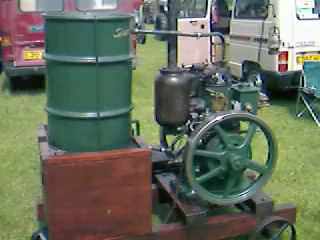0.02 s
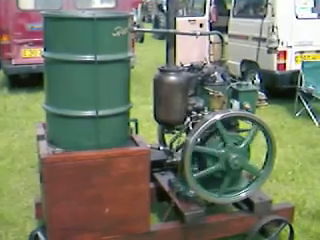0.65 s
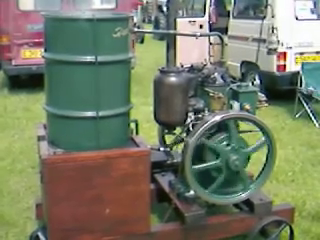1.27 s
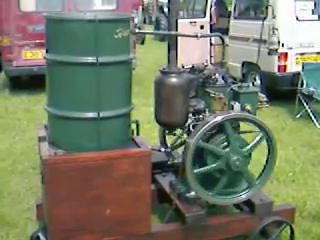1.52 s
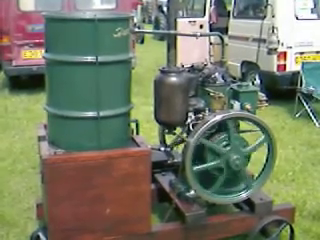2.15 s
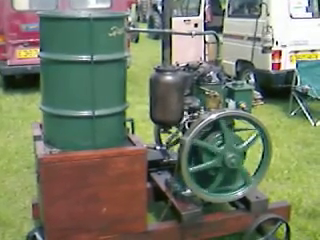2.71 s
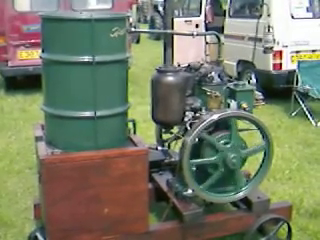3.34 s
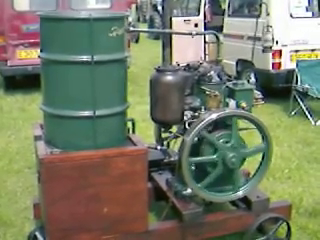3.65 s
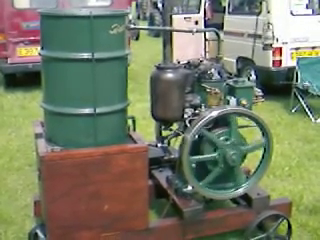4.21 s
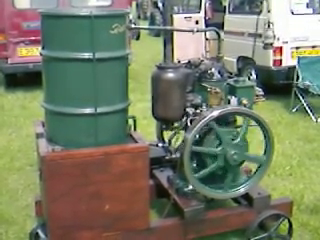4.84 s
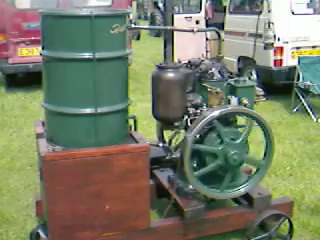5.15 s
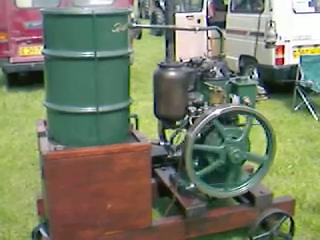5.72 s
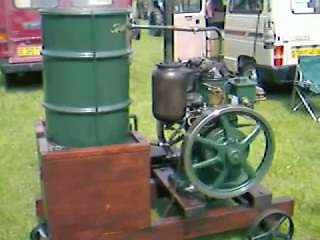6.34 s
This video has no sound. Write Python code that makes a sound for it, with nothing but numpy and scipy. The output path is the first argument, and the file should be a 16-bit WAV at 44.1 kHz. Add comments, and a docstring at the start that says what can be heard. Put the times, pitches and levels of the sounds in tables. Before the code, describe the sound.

Old engines run together throughout on an outdoor field, heard through a small microphone with little treble. The nearest keeps up a quick, even chuffing with clinking metal parts, mixed with the dry pops of a two-stroke and the deep thump and sharp tick of a third engine. Behind them is a rough din, broken by a far exhaust bark, then spits, another bark, more spits and a last bark.

```python
"""Old stationary engines run on a grass field, heard through a small camera's narrow-band microphone.
From the start, a near one-cylinder engine chuffs and clatters about seven times a second, a faster
two-stroke putters, and a third engine thumps and ticks over the din of the field. A far engine barks
at 0.25 s. Spits follow near 2.5 s, a bark at 3.4 s, more spits near 5.4 s and a last bark at 6.3 s.
Loud bursts make the camera turn its volume down for a moment."""
import sys
import numpy as np
from scipy import signal
from scipy.io import wavfile

SR = 44100
rng = np.random.default_rng(int(sys.argv[2]) if len(sys.argv) > 2 else 0)


def generate_wav(signal):
    """Clip the signal to [-1, 1] and save it as 16-bit WAV at the path in sys.argv[1]."""
    frames = np.transpose(np.atleast_2d(signal))
    scaled = np.clip(frames, -1, 1) * 32767
    pcm = np.round(scaled).astype(np.int16)
    wavfile.write(sys.argv[1], SR, pcm)


N = 285327


def near_engine(turn_s=.137575, rush_delay_s=.011, rush_rise_s=.01, rush_decay_s=.022):
    """Every steady turn brings a chuff, a rush of gas that rings the silencer shell, and knocks."""
    # exhaust puffs in one turn: delay_s, peak_db, low_hz, high_hz
    puffs = [(0.0164, -8, 125.8, 291.7), (0.0383, -22, 92.8, 259)]
    # tone of the rushing gas: pitch_hz, level_db
    rush_tone = [(300, -26.5), (700, -1), (1200, -10), (1900, -2.5), (2600, 14), (3600, -2.5), (4500, -11)]
    # ringing of the silencer shell: pitch_hz, width_hz, level_db
    shell_rings = [(1670, 40, -3), (1934, 70, -4), (2132, 60, -5), (2918, 40, 4), (3130, 60, -1),
                   (3636, 110, -1), (3900, 200, -3)]
    # parts that hit in one turn: delay_s, knock_db, clink_db, decay_s
    contacts = [(.0052, -24, -16, .003), (.0085, -13, -22, .004), (.0195, -16, -19, .005),
                (.0350, -17, -23, .005), (.0535, -20, -26, .006), (.0610, -21, -21, .002),
                (.0768, -19, -7.5, .0017), (.0810, -23, -18, .004), (.1010, -16, -28, .003),
                (.1045, -12, -25, .003)]
    # dull ringing of the cast iron: pitch_hz, width_hz, level_db
    casting = [(437.6, 31, -1), (626.5, 26, 4), (693.8, 22, 7.5), (757, 120, -7), (840, 210, -18.5),
               (1170, 160, -14)]
    # bright ringing of the valve parts: pitch_hz, width_hz, level_db
    valves = [(1280, 410, -11), (1930, 860, -5.5), (2300, 160, -17.5), (2950, 110, -4.5), (3210, 250, -4),
              (3600, 160, 9), (3864, 510, 0)]
    cycles = np.arange(.004, N / SR, turn_s)
    chuff = exhaust(cycles, puffs, pipe_hz=227.3, pipe_width_hz=13.5, pipe_db=16, uneven_db=1.47)
    bursts = [(s + rush_delay_s, rng.standard_normal(), rush_rise_s, rush_decay_s) for s in cycles]
    flow = gas_bursts(bursts)
    rush = from_db(-25) * flow * banded_noise(rush_tone, flicker_db=0)
    shell = from_db(-19) * body(flow * rng.standard_normal(N), shell_rings)
    knocks = clatter(cycles, contacts, casting, valves, dull_db=1, bright_db=.6, alike=.37, uneven_db=1.1)
    return chuff + rush + shell + knocks


def two_stroke_firings(turn_s=.045085):
    """The two-stroke fires every second turn; now and then it fires twice running, shifting its beat."""
    # double firings: time_s
    double_fires = [.24, 2.72, 4.39]
    turns = np.arange(.0138, N / SR, turn_s)
    doubles = [np.argmin(np.abs(turns - s)) for s in double_fires]
    return np.concatenate([stretch[::2] for stretch in np.split(turns, doubles)])


def two_stroke_engine(rush_db=-22, rush_decay_s=.0094):
    """A lightly loaded engine makes short dry pops, each with a little rush of gas."""
    # exhaust puff of one firing: delay_s, peak_db, low_hz, high_hz
    puffs = [(.0083, -10.5, 117.3, 339)]
    cycles = two_stroke_firings()
    delay_s = puffs[0][0]
    flow = gas_bursts([(s + delay_s, rush_db, .001, rush_decay_s) for s in cycles])
    pops = exhaust(cycles, puffs, pipe_hz=207, pipe_width_hz=97, pipe_db=9, uneven_db=2.2)
    return pops + body(flow * rng.standard_normal(N), [(746, 550, 0)])


def third_engine(cycle_s=.120744):
    """A very steady engine: its exhaust thumps deeply and its loose parts give a sharp double tick."""
    # exhaust puff of one cycle: delay_s, peak_db, low_hz, high_hz
    puffs = [(.0280, -16.5, 60, 206)]
    # parts that hit in one cycle: delay_s, knock_db, clink_db, decay_s
    contacts = [(.0162, -10, -28, .002), (.0205, -24, -6.5, .002), (.0310, -14, -28, .002),
                (.0340, -28, -9, .0035), (.0525, -20, -32, .003), (.0578, -30, -22, .002)]
    # dull ringing of the engine case: pitch_hz, width_hz, level_db
    case = [(430, 390, 2.5), (698, 96, 6.5), (866, 99, -11.5)]
    # bright ringing of the tappet, which pushes a valve: pitch_hz, width_hz, level_db
    tappet = [(3178, 283, 1.5), (3537, 323, 2), (3840, 390, -6.5)]
    cycles = np.arange(-.04884, N / SR, cycle_s)
    thump = exhaust(cycles, puffs, pipe_hz=105, pipe_width_hz=21, pipe_db=-5.5, uneven_db=2.5)
    ticks = clatter(cycles, contacts, case, tappet, dull_db=.5, bright_db=-2, alike=.59, uneven_db=.65)
    return thump + ticks


def hard_clacks(clink_boost_db=2.5):
    """Now and then a part lands harder: one very short blow into the iron."""
    # hard blows: start_s, knock_db, clink_db
    clacks = [(0.4715, -18, -7), (0.6097, 0, -18), (0.71, -13, -15.5), (1.2473, -5, -29), (1.888, -5, -18),
              (2.1444, -30, -10), (4.375, -3, -30), (5.0592, -5, -9), (5.8857, -3, -8)]
    # dull ringing of the iron: pitch_hz, width_hz, level_db
    dull_rings = [(480, 450, -4), (684, 510, 3.5), (970, 810, -2)]
    # bright ringing of the iron: pitch_hz, width_hz, level_db
    bright_rings = [(1990, 400, -11), (3270, 360, -1.5), (3640, 390, -6), (3726, 320, -1)]
    blow = swell(rise_s=.0004, decay_s=.0047)
    force = np.zeros((2, N))
    for start_s, knock_db, clink_db in clacks:
        add(force[0], start_s, from_db(knock_db) * blow)
        add(force[1], start_s, from_db(clink_db + clink_boost_db) * blow)
    knocks, clinks = force * rng.standard_normal((2, N))
    return body(knocks, dull_rings) + body(clinks, bright_rings)


def far_shots():
    """Engines further off let out single bursts of gas: a pipe barks, a vent spits."""
    # barks: start_s, level_db, rise_s, decay_s
    barks = [(.2470, -9.5, .002, .018), (3.4375, -8.5, .002, .022), (6.2950, -11, .002, .008)]
    # ringing of the pipe: pitch_hz, width_hz, level_db
    pipe = [(720, 150, -4), (950, 190, 0), (1200, 220, -6), (1800, 250, -8)]
    # spits: start_s, level_db, rise_s, decay_s
    spits = [(2.458, -7.5, 0.0076, 0.021), (2.5005, 2, 0.0038, 0.0061), (5.370, -7.5, 0.012, 0.047),
             (5.4480, 6, 0.0067, 0.0065)]
    # ringing of the vent: pitch_hz, width_hz, level_db
    vent = [(700, 180, -4.5), (2500, 3270, -7.5), (3640, 810, 1)]
    barking = body(gas_bursts(barks) * rng.standard_normal(N), pipe)
    spitting = body(gas_bursts(spits) * rng.standard_normal(N), vent)
    return barking + spitting


def field_din():
    """The rest of the field blurs into a flickering noise."""
    # tone of the din: pitch_hz, level_db
    din_tone = [(22, -7.5), (40, -11.5), (65, -14), (100, -1.5), (150, -1.5), (220, 3), (330, -6),
                (480, -6.5), (660, 2.5), (900, -9), (1400, -8.5), (2400, -12.5), (3700, -7), (4500, -13)]
    return from_db(-18.5) * banded_noise(din_tone, flicker_db=3.5)


def exhaust(cycles, puffs, pipe_hz, pipe_width_hz, pipe_db, uneven_db):
    """Each opening of the exhaust lets out a puff; the silencer rounds it and the pipe rings on."""
    out = np.zeros(N)
    strengths = from_db(uneven_db * rng.standard_normal(len(cycles)))
    for delay_s, peak_db, low_hz, high_hz in puffs:
        silencer = signal.butter(3, [low_hz, high_hz], "band", fs=SR, output="sos")
        pulse = signal.sosfilt(silencer, signal.unit_impulse(SR // 6))
        pulse = pulse + from_db(pipe_db) * resonate(pulse, pipe_hz, pipe_width_hz)
        for start_s, strength in zip(cycles, strengths):
            add(out, start_s + delay_s, strength * from_db(peak_db) * pulse / np.abs(pulse).max())
    return out


def clatter(cycles, contacts, dull_rings, bright_rings, dull_db, bright_db, alike, uneven_db):
    """Loose parts hit at set points in each cycle; alike (0 to 1) is the share of chatter that repeats."""
    knocks, clinks = np.zeros((2, N))
    for delay_s, knock_db, clink_db, decay_s in contacts:
        envelope = swell(.0006, decay_s)
        chatter = rng.standard_normal((len(cycles) + 1, SR // 10))[:, :len(envelope)]
        repeated = chatter[0] * np.sqrt(np.sum(envelope ** 2) / np.sum((chatter[0] * envelope) ** 2))
        changes_db = uneven_db * rng.standard_normal((len(cycles), 2))
        for start_s, fresh, (harder_db, sharper_db) in zip(cycles, chatter[1:], changes_db):
            touch = envelope * (np.sqrt(alike) * repeated + np.sqrt(1 - alike) * fresh)
            add(knocks, start_s + delay_s, from_db(knock_db + harder_db) * touch)
            add(clinks, start_s + delay_s, from_db(clink_db + sharper_db) * touch)
    return from_db(dull_db) * body(knocks, dull_rings) + from_db(bright_db) * body(clinks, bright_rings)


def gas_bursts(bursts):
    """The flow of gas over time: each burst swells and dies away."""
    flow = np.zeros(N)
    for start_s, level_db, rise_s, decay_s in bursts:
        add(flow, start_s, from_db(level_db) * swell(rise_s, decay_s))
    return flow


def banded_noise(tone, flicker_db):
    """Noise in bands half an octave wide, each of which can flicker by itself."""
    pitch_hz, level_db = np.transpose(tone)
    white = rng.standard_normal((2, N))
    edges_hz = 19 * 2 ** (np.arange(17) / 2)
    out = np.zeros(N)
    for k, (low, high) in enumerate(zip(edges_hz, edges_hz[1:])):
        band = signal.sosfilt(signal.butter(2, [low, high], "band", fs=SR, output="sos"), white[k % 2])
        band_db = np.interp(np.log(low * high) / 2, np.log(pitch_hz), level_db)
        out += band * from_db(band_db + flicker_db * drift(rate_hz=28))
    return rms_one(out)


def body(x, rings):
    """An object ringing at several pitches, scaled so that white noise keeps about its level."""
    power = sum(from_db(db) ** 2 * np.pi * width / SR for _, width, db in rings)
    parts = [(-1) ** k * from_db(db) * resonate(x, hz, width) for k, (hz, width, db) in enumerate(rings)]
    return sum(parts) / np.sqrt(power)


def resonate(x, pitch_hz, width_hz):
    """Ring at one pitch; a smaller width rings for longer."""
    r = np.exp(-np.pi * width_hz / SR)
    feedback = [1, -2 * r * np.cos(2 * np.pi * pitch_hz / SR), r * r]
    return signal.lfilter(np.array([1, 0, -1]) * (1 - r * r) / 2, feedback, x + 1e-18)


def swell(rise_s, decay_s):
    """A loudness curve that climbs to 1 and dies away."""
    t = np.arange(int((rise_s + 6 * decay_s) * SR)) / SR
    return np.minimum(t / rise_s, 1) * np.exp(-np.maximum(t - rise_s, 0) / decay_s)


def drift(rate_hz, step=40):
    """Smooth random wandering with a typical size of 1."""
    r = np.exp(-2 * np.pi * step * rate_hz / SR)
    slow = signal.lfilter([1], [1, -2 * r, r * r], rng.standard_normal(N // step + 2002))[2000:]
    return np.interp(np.arange(N) / step, np.arange(len(slow)), rms_one(slow))


def add(track, start_s, sound):
    """Mix a short sound into a track."""
    at = int(round(start_s * SR))
    first, last = max(at, 0), min(at + len(sound), N)
    if last > first:
        track[first:last] += sound[first - at:last - at]


def from_db(db):
    """Turn decibels into a multiplier."""
    return 10 ** (np.asarray(db) / 20)


def rms_one(x):
    """Scale a signal to an average (rms) level of 1."""
    return x / np.sqrt(np.mean(x ** 2) + 1e-20)


def gain_control(x, threshold_db=-9, sense_s=.0033, release_db_per_s=42, cut_per_db=1.57):
    """Loud bursts pull the volume down at once; it creeps back afterwards."""
    r = np.exp(-1 / (sense_s * SR))
    level_db = 10 * np.log10(signal.lfilter([1 - r], [1, -r], x ** 2) + 1e-12)
    excess_db = np.maximum(level_db - threshold_db, 0)
    recovery_db = release_db_per_s * np.arange(N) / SR
    cut_db = np.maximum.accumulate(cut_per_db * excess_db + recovery_db, axis=-1) - recovery_db
    return x * from_db(-cut_db)


def scene():
    """Three engines and hard clacks in front of far shots and the din, in one channel."""
    background = far_shots() + field_din()
    return (near_engine() + two_stroke_engine() + third_engine() + hard_clacks() + background)[None]


def record(dry, mic_top_hz=4130, cutoff_hz=15800):
    """The camera loses the high treble, turns loud bursts down and rounds off the peaks."""
    narrow = signal.sosfilt(signal.butter(34, mic_top_hz, fs=SR, output="sos"), dry)
    ducked = gain_control(narrow) - .027  # the wave sits slightly below zero
    clipped = np.clip(ducked, -.64, .64)
    rounded = clipped + .12 * np.tanh((ducked - clipped) / .12)
    return signal.sosfilt(signal.ellip(10, .1, 80, cutoff_hz, fs=SR, output="sos"), rounded)


dry = scene()
out = record(dry)
generate_wav(out)
```